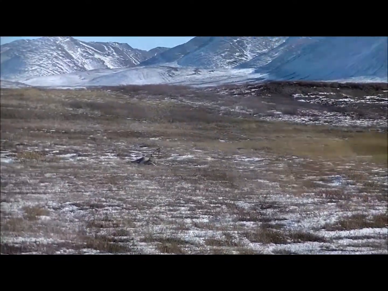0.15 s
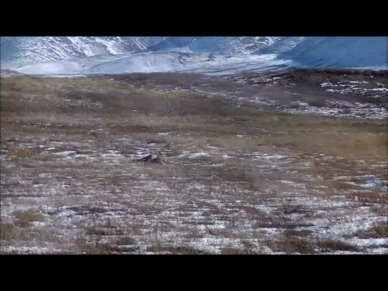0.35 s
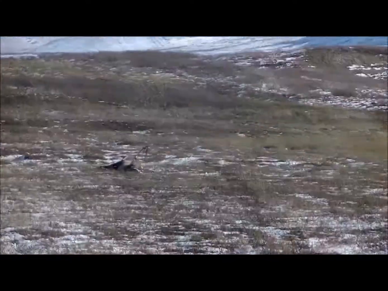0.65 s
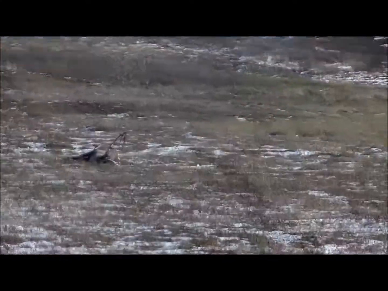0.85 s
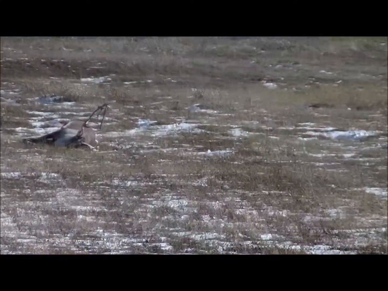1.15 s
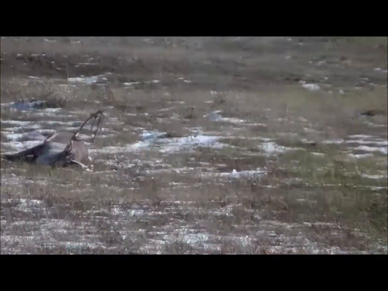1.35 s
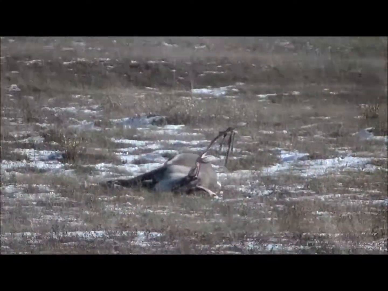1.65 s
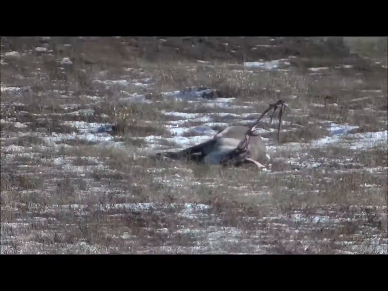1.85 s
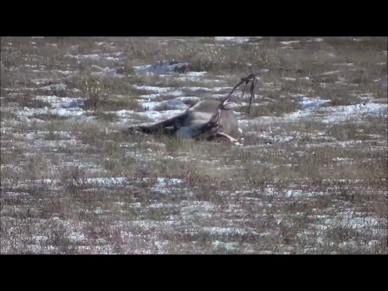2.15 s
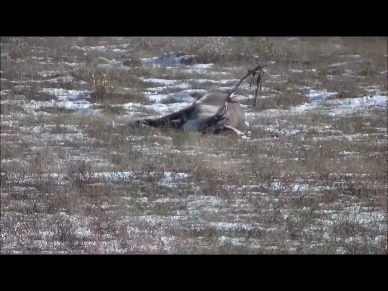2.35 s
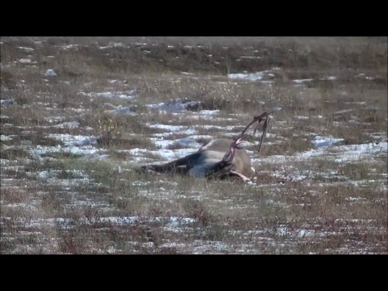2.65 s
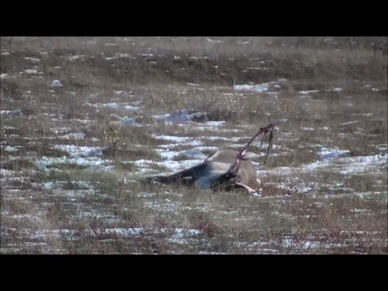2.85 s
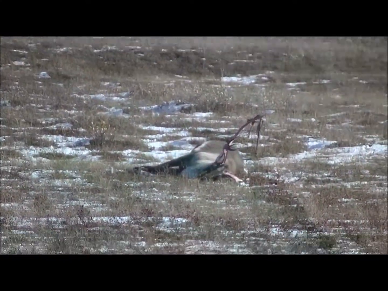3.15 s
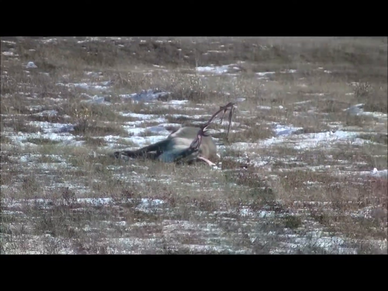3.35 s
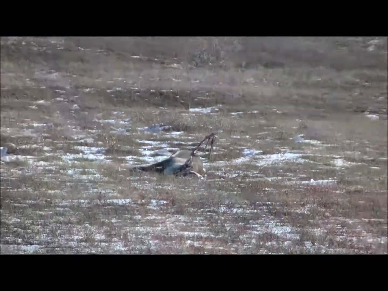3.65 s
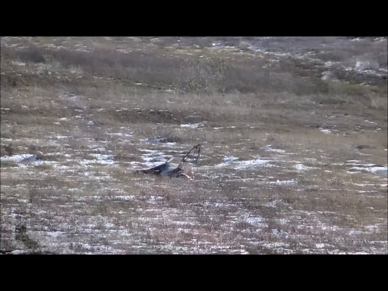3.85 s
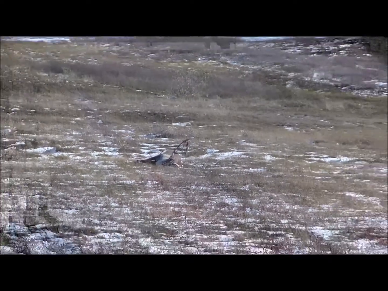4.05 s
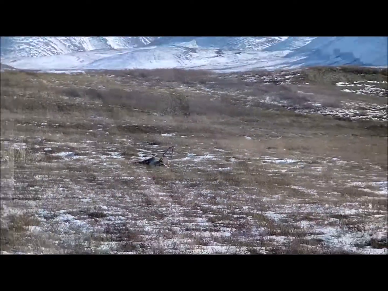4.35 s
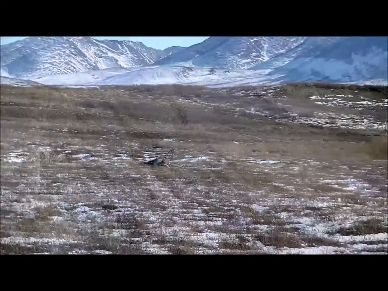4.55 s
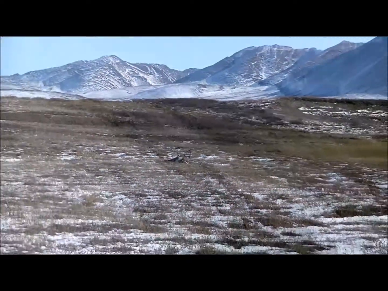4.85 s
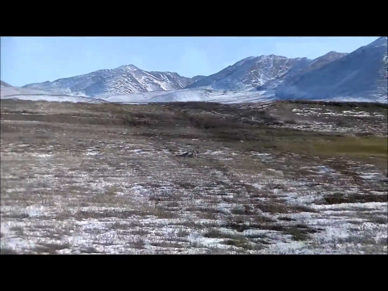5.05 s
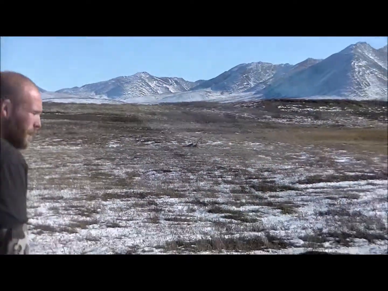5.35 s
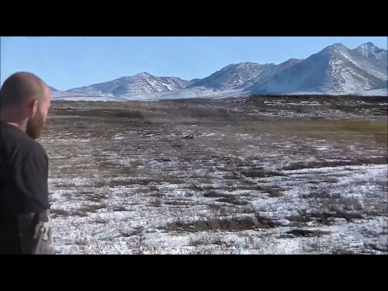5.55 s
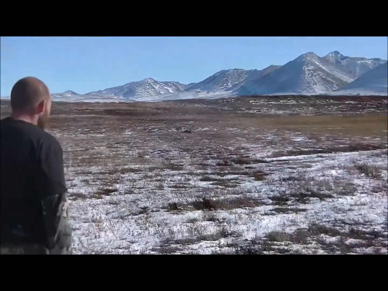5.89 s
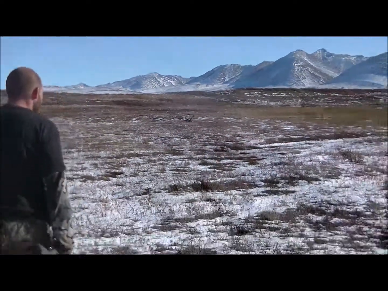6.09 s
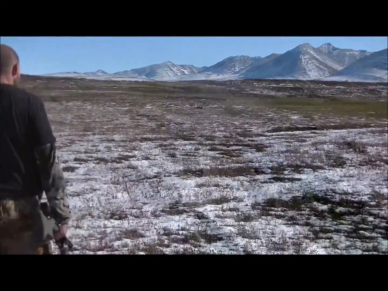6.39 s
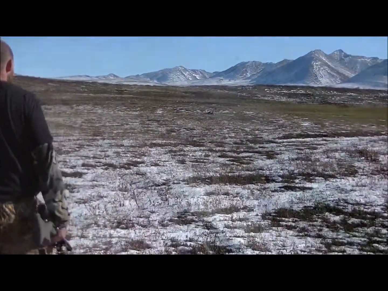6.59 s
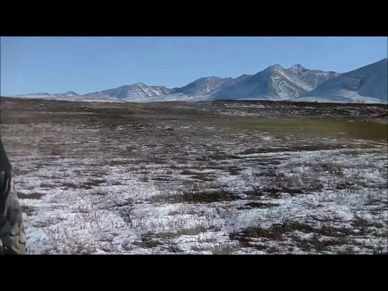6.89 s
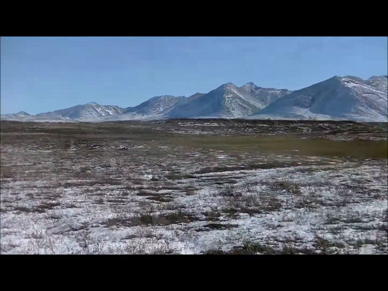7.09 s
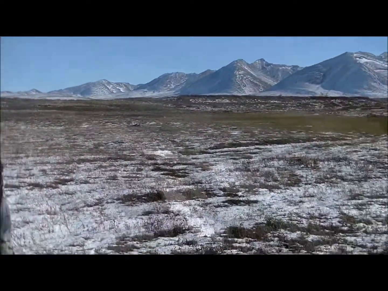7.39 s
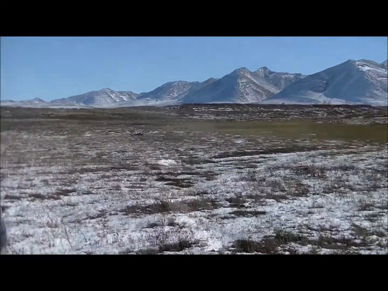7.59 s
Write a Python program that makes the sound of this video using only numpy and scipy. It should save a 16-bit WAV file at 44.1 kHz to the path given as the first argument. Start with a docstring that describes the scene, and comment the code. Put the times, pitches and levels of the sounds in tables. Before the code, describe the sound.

A small camera zoom motor hums and whirs twice, with sharp plastic clicks and fingers rubbing the case over faint hiss.

```python
"""A hand-held camera's zoom motor hums in, and later out again, its gears whirring in the housing.
In between, the focus motor chatters faintly as its tiny nudges ring the lens barrel.
Fingers and a sleeve rub and scuff the case, the zoom switch ticks, the shell snaps and the grip thumps.
Under it all the hand rumbles, the microphones hiss and the electronics whistle thinly.
The camera is on a still, open plain, so there is no echo."""
import sys
import numpy as np
from scipy import signal
from scipy.fft import rfft, irfft
from scipy.io import wavfile
from scipy.ndimage import uniform_filter1d

SR = 44100
rng = np.random.default_rng(int(sys.argv[2]) if len(sys.argv) > 2 else 0)


def dump_mix(stems):
    """Bounce the given channels to the path in sys.argv[1] as a 16-bit WAV at rate SR."""
    frames = np.atleast_2d(stems).T  # one column per channel
    limited = np.clip(frames, -1, 1)  # hard clip at full scale
    pcm = np.round(limited * 32767).astype(np.int16)
    wavfile.write(sys.argv[1], SR, pcm)


N = 340672

FOCUS_HZ = 60.0  # focus nudges per second, two for each picture frame
# How hard the restless hand rubs the case: t/s, level/dB
HAND_RUBBING = [(0, -57.5), (.95, -56), (1.3, -57.5), (1.55, -52.5), (1.74, -62), (2.45, -71.5),
                (2.92, -68), (3.03, -62), (3.08, -62.5), (3.4, -58), (3.7, -65.5), (5.2, -63.5),
                (5.75, -57.5), (6.0, -53), (6.42, -51), (7.1, -52), (7.72, -53)]
# Fingers knocking on the case: t/s, peak/dB, f/Hz, ring time/s (to fade by 60 dB), grit level/dB
FINGER_KNOCKS = [(2.915, -33.5, 415, 0.0059, -57), (3.006, -34, 382, 0.0048, -60),
                 (5.2986, -38, 390, 0.0043, -52.5), (6.185, -17.5, 196, 0.011, -58),
                 (6.191, -23, 268, 0.013, -42), (6.328, -37.5, 295, 0.008, -48.5),
                 (6.569, -37.5, 324, 0.008, -46), (6.98, -35, 317, 0.0052, -46),
                 (7.161, -33, 407, 0.02, -45), (7.325, -50, 297, 0.016, -50), (7.495, -42, 280, 0.01, -58)]


def undb(db):
    """Turn decibels into a gain to multiply by."""
    return 10 ** (np.asarray(db) / 20)


def unit(x):
    """Scale a signal to an average (rms) level of 1."""
    return x / np.sqrt(np.mean(x ** 2))


def frequencies():
    """The frequency of each point of the spectrum, in Hz."""
    return np.maximum(np.arange(N // 2 + 1) * SR / N, 1)


def shape(points):
    """A gain for each frequency, drawn through points of f/Hz, level/dB."""
    hz, db = np.transpose(points)
    return undb(np.interp(np.log(frequencies()), np.log(hz), db))


def resonances(peaks):
    """A gain for each frequency, for a body that favours some pitches: f/Hz, width/Hz, level/dB."""
    f = frequencies()
    power = sum(undb(db) ** 2 / (1 + ((f * f - hz * hz) / (f * width)) ** 2 / 2) ** 2
                for hz, width, db in peaks)
    return np.sqrt(power)


def colour(x, gain):
    """Filter a signal with a gain for each frequency."""
    return irfft(rfft(x) * gain, N)


def to_microphones(noises, gain):
    """Send two noises through one body: both microphones share one and get the other with opposite sign."""
    # How unlike the two microphones sound: f/Hz, opposite part over shared part/dB
    stereo_width = [(25, -36), (120, -19.5), (400, -15.5), (700, -20), (1300, -20.5), (2400, -8.5),
                    (3400, -3), (4600, -9), (5800, 0), (7400, -1), (9700, -5), (11500, -4.5), (12600, -2),
                    (14500, 5)]
    width = shape(stereo_width)
    shared_gain = gain / np.sqrt(1 + width ** 2)
    shared = colour(noises[0], shared_gain)
    opposite = colour(noises[1], shared_gain * width)
    return unit(np.array([shared + opposite, shared - opposite]))


def wander(rate_hz):
    """A smooth random drift, about 1 in size."""
    hold = int(SR / rate_hz)
    stairs = np.repeat(rng.standard_normal(N // hold + 1), hold)
    return 1.2 * uniform_filter1d(stairs, hold)[:N]


def curve(points):
    """Join points of t/s, value with straight lines."""
    return np.interp(np.arange(N) / SR, *np.transpose(points))


def gate(start, stop, rise_s, fade_s):
    """Rise from start, hold until stop, then die away."""
    t = np.arange(N) / SR
    return np.clip((t - start) / rise_s, 0, 1) * np.exp(-np.maximum(t - stop, 0) / fade_s)


def add(out, start, sound):
    """Mix a short sound in, start seconds from the beginning."""
    i = int(start * SR)
    out[:, i:i + sound.shape[1]] += sound[:, :N - i]


def friction(tilt_db, grain_db=3.0):
    """Many tiny, uneven slips ring the case; tilt_db per octave makes them brighter or duller."""
    # Pitches the rubbed case favours: f/Hz, width/Hz, level/dB
    case_peaks = [(318, 200, -1.5), (910, 250, -5), (1170, 120, -3), (1490, 420, -4), (1833, 170, 2.5),
                  (2480, 1070, 2.5), (3740, 1400, 1.5), (4480, 540, 2), (4800, 560, 3), (5820, 1500, 1),
                  (7290, 770, 1.5), (8540, 900, -6.5), (9650, 950, 1), (10700, 970, -11),
                  (12300, 1400, -10.5), (14600, 580, -8.5)]
    slips = rng.standard_normal((2, N)) * undb(grain_db * wander(3000))
    brightness = undb(tilt_db * np.log2(np.maximum(frequencies(), 400)))
    return to_microphones(slips, resonances(case_peaks) * brightness)


def rubbing(hand_tone=-0.74, unsteady_db=1.42):
    """The hand never quite rests, and single strokes of skin and cloth swell and fade on top."""
    # Strokes over the case: start/s, stop/s, level/dB, tone (-3 or less is dull, 3 or more is bright)
    strokes = [(0, 0.268, -57.5, 7), (0.093, 0.154, -53, 6), (0.256, 0.433, -50.5, 5),
               (0.484, 0.75, -57.5, 3), (0.731, 0.788, -48, 0), (1.364, 1.596, -52, -0.5),
               (2.563, 2.586, -56, 5.5), (2.61, 2.625, -69, 1), (3.12, 3.17, -61.5, -2),
               (5.87, 6.183, -56, -7), (6.154, 6.27, -49, -1.5), (6.49, 6.586, -47, 3),
               (6.617, 7.06, -48, 3), (6.673, 6.69, -48, 3), (6.762, 6.875, -45, 1), (7.162, 7.22, -48, 3),
               (7.234, 7.52, -50, 7), (7.598, 7.72, -53.5, 3)]
    touches = [(undb(curve(HAND_RUBBING)), hand_tone)]
    for start, stop, db, tone in strokes:
        touches.append((undb(db) * gate(start, stop, rise_s=0.025, fade_s=0.042), tone))
    dull_power, bright_power = 0, 0
    for gain, tone in touches:
        bright_share = np.clip(.5 + tone / 6, 0, 1)
        dull_power += (1 - bright_share) * gain ** 2
        bright_power += bright_share * gain ** 2
    dull = np.sqrt(dull_power) * friction(tilt_db=-2.26)
    bright = np.sqrt(bright_power) * friction(tilt_db=2.0)
    return (dull + bright) * undb(unsteady_db * wander(35))


def hand_rumble(rest_rumble_db=-69, rest_rubbing_db=-62, follow=0.63, unsteady_db=4.1):
    """The hand makes a low, uneven rumble that grows as it rubs harder."""
    # Tone of the rumble: f/Hz, relative level/dB
    spectrum = [(20, 4), (60, -3), (125, 1), (220, 2), (380, -6), (650, -22.5), (2000, -46)]
    level_db = rest_rumble_db + follow * (curve(HAND_RUBBING) - rest_rubbing_db)
    rumble = to_microphones(rng.standard_normal((2, N)), shape(spectrum))
    return rumble * undb(level_db + unsteady_db * wander(14))


def electronics(hiss_db=-62, whistle_db=-81, whistle_hz=7881):
    """Each microphone hisses, and two close tones make a thin whistle that pulses at the frame rate."""
    # Tone of the hiss: f/Hz, relative level/dB
    spectrum = [(20, -12), (150, -6.5), (400, 3), (650, -8.5), (900, -4), (1500, -1.5), (4000, -0.5),
                (7000, -2.5), (10000, -4.5), (13000, -6), (15500, -12)]
    hiss = unit(colour(rng.standard_normal((2, N)), shape(spectrum)))
    whistle = 0
    for hz in (whistle_hz, whistle_hz - FOCUS_HZ / 2):
        drifting_hz = hz * (1 + 0.00034 * wander(300))
        whistle += np.sin(2 * np.pi * np.cumsum(drifting_hz) / SR)
    return undb(hiss_db) * hiss + undb(whistle_db) * whistle


def thump(hz, ring_s, case_hz=320, case_db=-7, case_ring_s=0.4, rise_cycles=0.73):
    """The camera rocks on the palm and the case's lowest tone joins in; both fade together. Peak 1."""
    t = np.arange(SR // 5) / SR
    case_tone = undb(case_db - 60 * t / case_ring_s) * np.sin(2 * np.pi * case_hz * t)
    rise = (1 - np.exp(-t * hz / rise_cycles)) ** 2
    swing = (np.sin(2 * np.pi * hz * t) + case_tone) * rise * undb(-60 * t / ring_s)
    return swing[None] / np.abs(swing).max()


def grip_thumps():
    """The palm bumps softly, each bump with its own low pitch, and fingers knock dully."""
    # Bumps on the palm: t/s, peak/dB, f/Hz, ring time/s
    bumps = [(.011, -48.5, 120, 0.045), (1.99, -56.5, 136, 0.078), (3.207, -51.5, 247, 0.067),
             (4.866, -47, 135, .055), (5.32, -54, 123, 0.089), (5.6, -47, 130, 0.038),
             (6.046, -44, 127, 0.046), (6.12, -38, 134, 0.044), (6.239, -36, 119, 0.075),
             (6.276, -40, 130, 0.1), (6.319, -36, 130, 0.13), (6.412, -36, 140, 0.029),
             (6.43, -43, 170, 0.027), (6.536, -33.5, 121, 0.03), (6.553, -38, 149, 0.041),
             (7.368, -44, 130, 0.037), (7.425, -45, 137, 0.076), (7.529, -46, 129, 0.052),
             (7.578, -52, 120, 0.055)]
    out = np.zeros((2, N))
    for start, db, hz, ring_s, *_ in [*bumps, *FINGER_KNOCKS]:
        add(out, start, undb(db) * thump(hz, ring_s))
    return out


def ring(tones, tilt_db, rise_s, length=1):
    """A struck part rings with fading tones that reach the two microphones out of step. Peak 1."""
    t = np.arange(SR // 10) / SR
    sound = 0
    for k, (hz, db, ring_s, left_lead) in enumerate(tones):
        strength = (-1) ** k * undb(db + tilt_db * np.log2(hz))
        fade = undb(-60 * t / (ring_s * length))
        sound += strength * fade * np.sin(2 * np.pi * hz * t + left_lead * np.array([[.5], [-.5]]))
    sound *= 1 - np.exp(-t / rise_s)
    return sound / np.abs(sound).max()


def switch_ticks(left_db=-1.5):
    """The plastic zoom switch and case tick, each tick with its own pitch and brightness."""
    # Ticks: t/s, peak on the right/dB, tilt/(dB per octave), pitch factor
    ticks = [(0.0474, -27.5, 17, 0.93), (0.0484, -28, -5, 1.11), (0.0517, -34, 19, 0.84),
             (0.0573, -47, -13, 0.84), (1.1682, -29.3, -13, 0.97), (1.1707, -34, 15, .98),
             (1.3343, -34.5, -3, 0.98), (1.3363, -31.5, -3, 1.02), (1.3439, -33, -2, 0.97),
             (2.251, -44.5, 10.5, 1.05), (2.9168, -39, -11, 1.23), (3.2003, -28, -6, 1.14),
             (3.2018, -26, 6.5, 1.0), (3.2074, -38, 3, 0.89), (3.214, -33, 3, 1.0), (5.525, -37, 15, 1.3),
             (5.606, -42, 15, 1.25), (5.63, -42, 14, 1.2), (6.0835, -18.5, 11, 1.13),
             (6.1872, -20.5, 15, 0.94), (6.19, -27.5, -2, 0.91), (7.438, -28, 15, 1.1),
             (7.442, -40.5, -2, 0.91)]
    # Tones of the switch and case: f/Hz, level/dB, ring time/s, left lead/rad
    switch_tones = [(1120, -19.5, 0.0036, 0), (1452, 4, 0.027, 0.13), (1670, -1, 0.015, 0.53),
                    (1864, 3.5, 0.02, 0.58), (2570, 2, 0.009, 0.45), (3190, -8.5, 0.025, 1.2),
                    (3480, -5.5, 0.011, 0.66), (3720, -1.5, 0.0058, 1.1), (4490, -14, 0.0045, 0)]
    out = np.zeros((2, N))
    for start, db, tilt_db, pitch in ticks:
        tones = np.array(switch_tones) * [pitch, 1, 1, 1]
        gains = undb(db + np.array([[left_db], [0]]))
        add(out, start, gains * ring(tones, tilt_db, rise_s=0.00021))
    return out


def zoom_drive(rise_s=0.012, hum_rise_s=0.037, fade_s=0.016, bite_gain=1.1, bite_s=0.023):
    """Gains of the hum and the gears: the motor creeps briefly, then runs, the gears biting at first."""
    # Zooming in, then out: start/s, stop/s, hum/dB, gears/dB, hum while creeping/dB
    runs = [(0.279, 1.509, -45.5, -56, -69), (3.392, 6.25, -49.5, -56, -62)]
    creep_lead_s, creep_length_s, creep_gear_db = 0.14, 0.059, -3
    t = np.arange(N) / SR
    hum, gears = 0, 0
    for start, stop, hum_db, gear_db, creep_db in runs:
        creep_start = start - creep_lead_s
        creep = gate(creep_start, creep_start + creep_length_s, rise_s, fade_s)
        running = gate(start, stop, rise_s, fade_s)
        bite = 1 + bite_gain * np.exp(-np.abs(t - start) / bite_s)
        hum += undb(hum_db) * gate(start, stop, hum_rise_s, fade_s) + undb(creep_db) * creep
        gears += undb(gear_db) * (running * bite + undb(creep_gear_db) * creep)
    return hum, gears


def motor_hum(steps, reverse_s=2.5):
    """The motor's steps make clean overtones, in one mix zooming in and another zooming out."""
    # Overtones: multiple of the step rate (rounded below), level zooming in/dB, level zooming out/dB
    overtones = [(2, -1, 1.35), (3, -9.5, -12.5), (4, -28.5, -25.5), (10, -24, -44), (15, -42, -26),
                 (19, -39, -31), (21, -29, -30), (24, -29, -27), (26, -33, -33), (29, -34, -49),
                 (31, -29, -49), (36, -27, -33), (37, -24.5, -23), (38, -28, -32), (39, -39, -40),
                 (40, -34, -40), (42, -42, -28.5), (45, -34, -33), (83.5, -37, -45)]
    zooming_in = np.arange(N) / SR < reverse_s
    hum = 0
    for multiple, in_db, out_db in overtones:
        strength = np.where(zooming_in, undb(in_db), undb(out_db))
        flicker = 1 + 0.064 * np.sqrt(multiple) * wander(40)
        phase = 2 * np.pi * round(multiple) * steps + rng.uniform(0, 2 * np.pi)
        hum += strength * flicker * np.sin(phase)
    return np.sqrt(2) * hum


def gear_whirr(steps, step_hz, buzz_db=-15, throb_depth=0.083, flutter_db=1.17):
    """Gear teeth scrape in the housing; part of the scrape repeats with every step, so it buzzes."""
    # Pitches the gears and housing favour: f/Hz, width/Hz, level/dB
    gear_peaks = [(353, 88, 1.5), (995, 86, 0.5), (1120, 160, -4), (1440, 230, 3), (1690, 410, 2.5),
                  (2250, 130, 4), (2500, 230, 1), (3340, 1200, -3), (4260, 230, -1), (6280, 380, -4.5),
                  (7650, 1400, -13), (9000, 650, -19)]
    period = round(SR / step_hz)
    place_in_step = (steps * period).astype(int) % period
    buzz = rng.standard_normal((2, period))[:, place_in_step]
    scrape = rng.standard_normal((2, N)) + undb(buzz_db) * buzz
    throb = 1 + throb_depth * np.sin(4 * np.pi * steps)  # twice per step
    flutter = undb(flutter_db * wander(30))
    whirr = to_microphones(scrape * throb * flutter, resonances(gear_peaks))
    return whirr * undb([[-.6], [.6]])  # a little louder on the right


def zoom_motor(step_hz=119.87, speed_drift=0.00085):
    """The motor turns in small steps at an almost steady rate, humming and driving its gears."""
    hum_gain, gear_gain = zoom_drive()
    steps = np.cumsum(step_hz * (1 + speed_drift * wander(25))) / SR
    return motor_hum(steps) * hum_gain + gear_whirr(steps, step_hz) * gear_gain


def shell_snaps():
    """Hard snaps briefly ring the shell right beside the microphones."""
    # Snaps: t/s, peak/dB, tilt/(dB per octave), left minus right/dB, ring time factor
    snaps = [(0.6773, -28.5, 1.5, -2, 0.9), (0.728, -33, -2, 0, .8), (0.7675, -24, -2, 0, 0.37),
             (1.4386, -4.5, 1.5, 1.5, 1.1), (1.4399, -13, 0, 1, 0.96), (1.504, -28, -3, -6, 0.88),
             (3.0527, -30.5, 2.5, -14, 0.12), (5.297, -33, -6, 2, 0.89), (6.1862, -25, -2.5, 0, 2.3),
             (6.56, -25, -2, 0, 0.7), (6.596, -39, -2, 0, .5), (7.01, -32, -7, 0, .6),
             (7.5192, -37, -9, 3, 1.2)]
    # Tones of the shell: f/Hz, level/dB, ring time/s, left lead/rad
    shell_tones = [(1490, -3, 0.0035, .4), (2050, 0, 0.0072, 0.63), (2830, -3, 0.0068, 0.49),
                   (3660, 2, 0.0086, 1.24), (4330, -3, 0.0096, 0.42), (5780, 4.5, 0.0067, 1.5),
                   (6920, 1, 0.0079, 2.3), (7400, -4.5, 0.0097, 1.3), (8050, 0, 0.0082, 1.02),
                   (9300, 1, 0.0062, 1.6), (10200, -0.5, 0.0083, 0.72), (11280, -3.5, 0.0083, 1.4),
                   (12560, -4.5, 0.0055, 0.65), (13400, -4, .004, 1.8), (14300, -7, 0.0049, 1.4)]
    out = np.zeros((2, N))
    for start, db, tilt_db, pan_db, length in snaps:
        gains = undb(db + pan_db * np.array([[.5], [-.5]]))
        add(out, start, gains * ring(shell_tones, tilt_db, rise_s=0.00017, length=length))
    return out


def grip_scuffs(grit_rise_s=0.0044, grit_band_hz=(354, 1200)):
    """The grip catches quickly and slides out; each knocking finger also skids with a little low grit."""
    # Scuffs: t/s, level/dB, time to the peak/s, lowest f/Hz, highest f/Hz
    scuffs = [(0.78, -53.5, 0.004, 606, 1020), (2.9149, -38.5, 0.0013, 500, 1700),
              (5.296, -44.5, 0.0032, 3720, 5500), (5.378, -52, 0.0044, 3800, 5400),
              (5.41, -58.5, .025, 4300, 5400), (5.555, -55, 0.023, 3900, 5400),
              (5.85, -42, 0.0082, 1100, 4600), (6.056, -41, 0.0067, 345, 3600),
              (6.077, -36.5, 0.00085, 348, 4000), (6.169, -44, 0.01, 2800, 6500),
              (6.1836, -26, 0.0028, 880, 4060), (6.202, -45, 0.0052, 2600, 10100),
              (6.795, -52, .013, 1090, 1620), (6.995, -54.5, 0.021, 1030, 1270),
              (7.141, -41.5, 0.013, 1400, 8500), (7.156, -40.5, 0.0056, 496, 6650),
              (7.257, -46.5, .006, 2200, 6000), (7.439, -44.5, 0.014, 2400, 7000),
              (7.517, -39.5, 0.0017, 3400, 6500), (7.528, -46, 0.0086, 3800, 6500)]
    skids = [(start, grit_db, grit_rise_s, *grit_band_hz) for start, *_, grit_db in FINGER_KNOCKS]
    slips = friction(tilt_db=-3.4)
    t = np.arange(N) / SR
    out = np.zeros((2, N))
    for start, db, rise_s, low_hz, high_hz in [*scuffs, *skids]:
        sliding = (t >= start) & (t < start + 8 * rise_s)
        age = (t[sliding] - start) / rise_s
        band = signal.butter(2, (low_hz, high_hz), "band", fs=SR, output="sos")
        scuff = unit(signal.sosfilt(band, slips[:, sliding]))
        out[:, sliding] += undb(db) * age * np.exp(1 - age) * scuff
    return out


def focus_motor(scatter_db=1.5, tilt_scatter_db=3.0, detune=0.023, rattle_db=-8, rattle_s=0.0068):
    """Each small nudge of the motor ticks against the lens barrel, then rattles once more."""
    # Runs of the motor: start/s, stop/s, typical peak/dB, change on every other nudge/dB
    runs = [(1.645, 1.84, -48, -3), (1.84, 2.025, -47, 0), (2.025, 2.225, -50, -1.5),
            (2.295, 2.625, -53, -5)]
    # Tones of the lens barrel: f/Hz, level/dB, ring time/s, left lead/rad
    barrel_tones = [(1505, 0, 0.012, .2), (1837, -3.5, .028, .4), (2070, 6, .007, .5),
                    (2550, -3, 0.034, .6), (2950, -8, 0.051, .9), (3400, 6, 0.0076, 0.83)]
    out = np.zeros((2, N))
    variations = rng.standard_normal((int(N / SR * FOCUS_HZ), 4))
    for nudge, (size, tilt, pitch, slack) in enumerate(variations):
        when = nudge / FOCUS_HZ + .001
        for start, stop, db, change_db in runs:
            if start <= when < stop:
                tones = np.array(barrel_tones) * [1 + detune * pitch, 1, 1, 1]
                peak_db = db + scatter_db * size + (0 if nudge % 2 else change_db)
                tick = undb(peak_db) * ring(tones, tilt_scatter_db * tilt, rise_s=0.0014)
                add(out, when, tick)
                add(out, when + rattle_s * np.exp(slack / 2), undb(rattle_db) * tick)
    return out


def scene():
    """The camera hears itself: its motors, the hand on its case and a quiet background."""
    motors = zoom_motor() + focus_motor()
    handling = rubbing() + grip_thumps() + switch_ticks() + shell_snaps() + grip_scuffs()
    return motors + handling + hand_rumble() + electronics()


def record(dry, low_cut_hz=66, top_hz=15800):
    """The camera thins the deep bass and steeply cuts the highest treble."""
    bass_cut = signal.butter(2, low_cut_hz, "high", fs=SR, output="sos")
    treble_cut = signal.ellip(10, .2, 70, top_hz, fs=SR, output="sos")
    return signal.sosfilt(treble_cut, signal.sosfilt(bass_cut, dry))


dry = scene()
out = record(dry)
dump_mix(out)
```